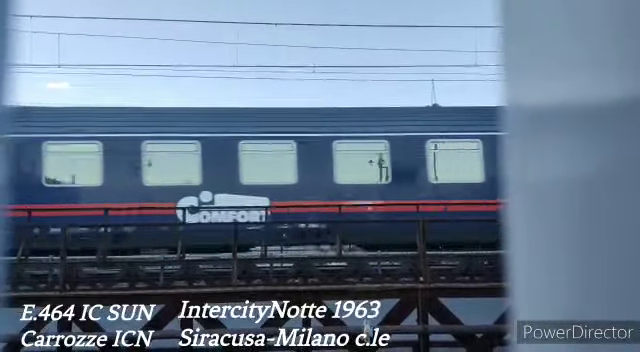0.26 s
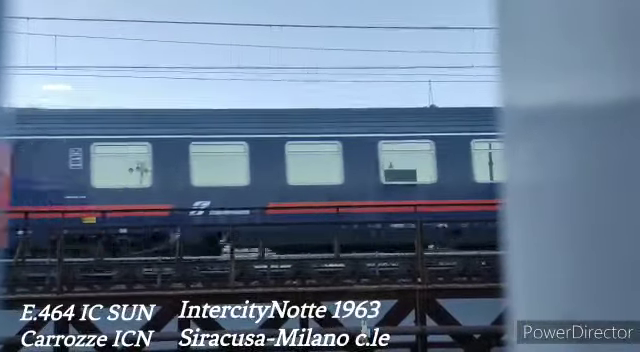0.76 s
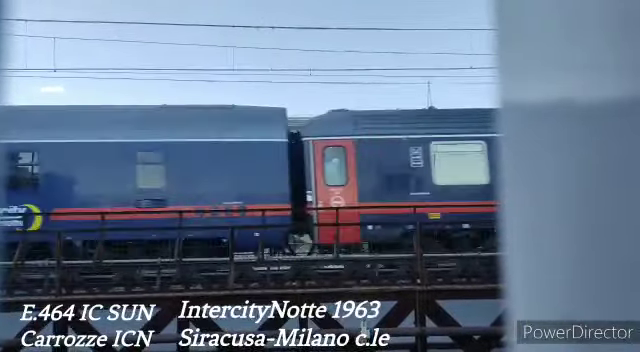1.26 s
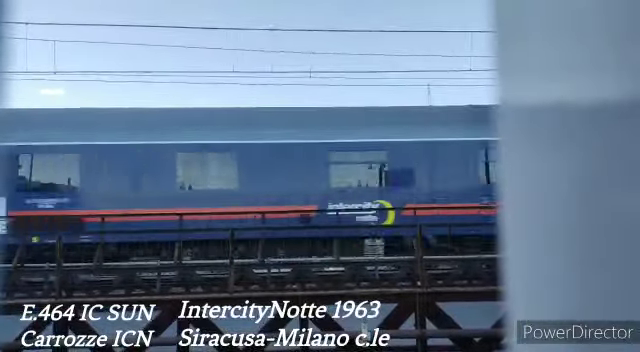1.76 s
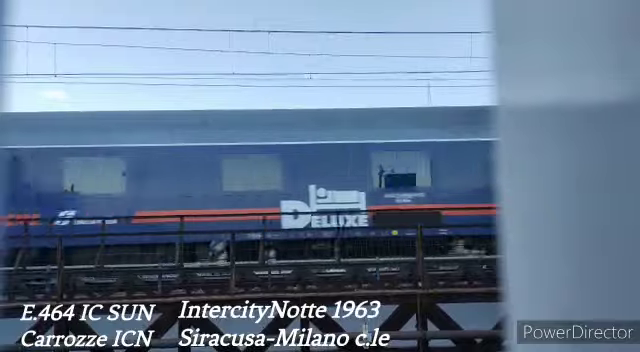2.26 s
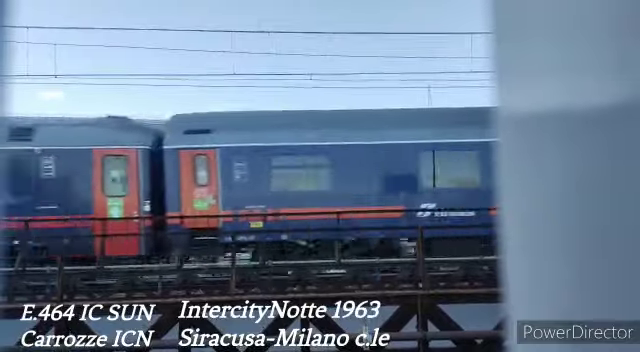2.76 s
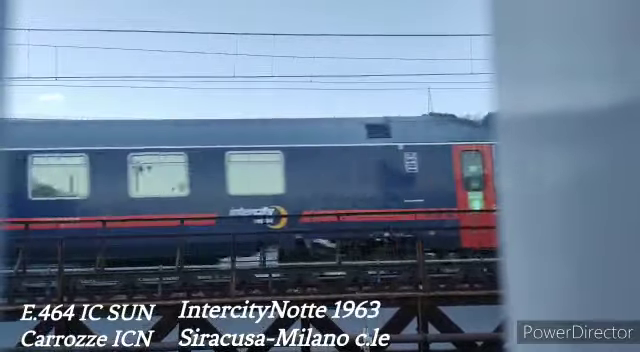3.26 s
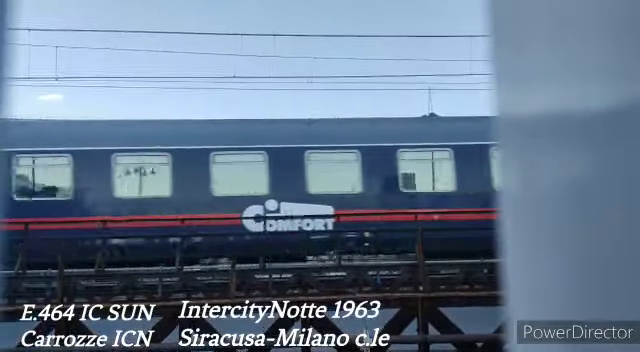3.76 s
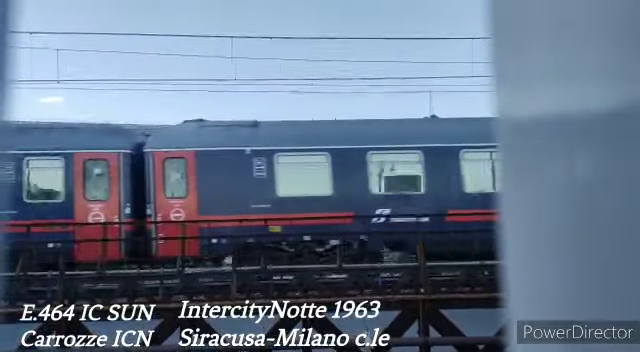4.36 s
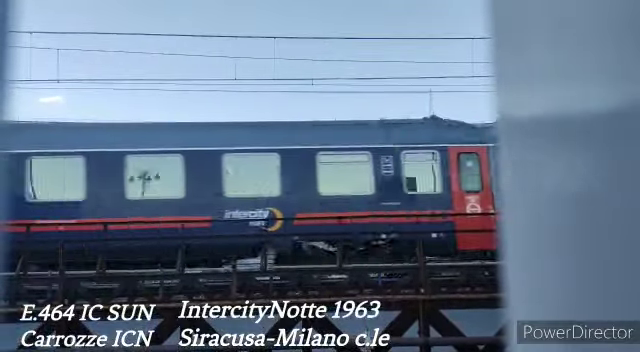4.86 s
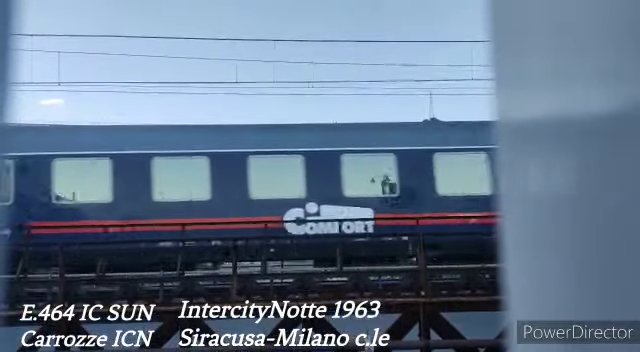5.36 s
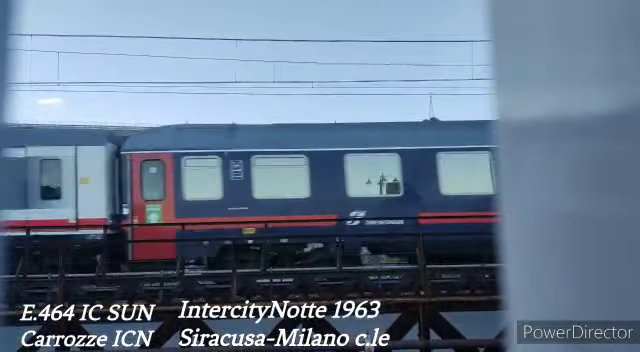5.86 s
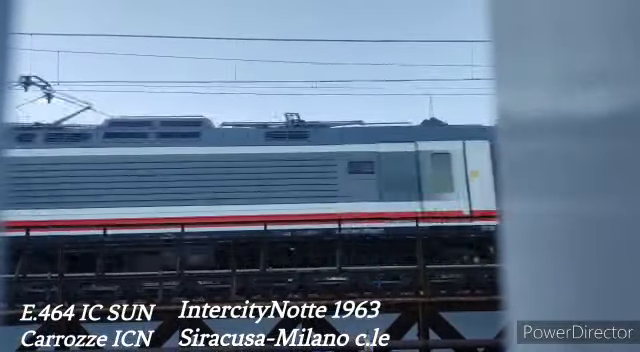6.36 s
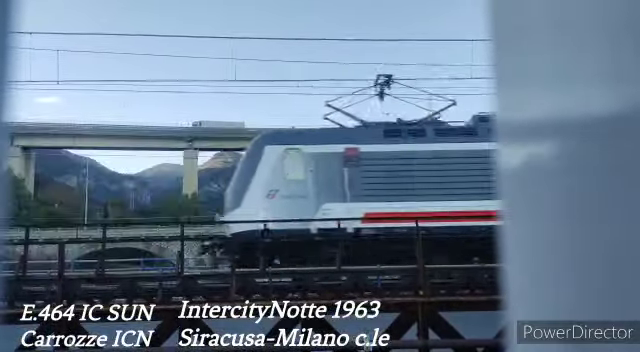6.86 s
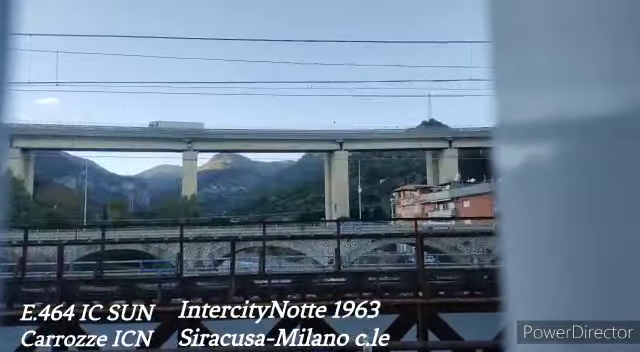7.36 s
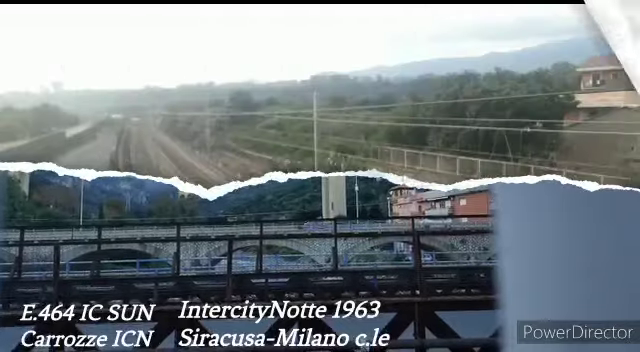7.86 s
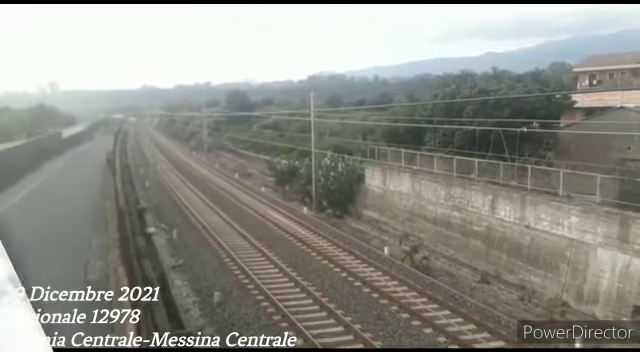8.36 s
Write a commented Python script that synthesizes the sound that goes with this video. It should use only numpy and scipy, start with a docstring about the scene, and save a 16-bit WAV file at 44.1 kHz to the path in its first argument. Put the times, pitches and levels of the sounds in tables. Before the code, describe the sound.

From 0 s a passenger train is already crossing a steel bridge very close by: girders boom with a low fluttering hum, wheels and deck roar, and rails rush and ring. The roar is strongest around 1.5-3 s, with scattered knocks, clanks of loose steel and deep thumps. Bright hissing scrapes and very short squeals crowd in near 3.5-5 s, shifting across the stereo. Around 4-7 s an out-of-round wheel thuds and throbs nearly six times a second. From about 6.2 s the rear electric locomotive brings a smeared, wavering whine and fan noise, peaking near 6.4-7.4 s and sinking slightly in pitch while the wheel noise recedes. At 7.4-7.65 s compressed air bursts out in sputtering puffs with a thin whistling tail. At 7.95 s everything cuts off. A tiny wash opens a quiet trackside murmur, with dry ticks near 8.2 and 8.45 s and a barely audible rustle.

```python
"""On a steel railway bridge, close by: a passenger train rolls over with its electric locomotive at the rear.
Filtered noise makes the girders boom, the deck roar, the rails ring and the bogies hiss; dying bursts of
force make knocks, clanks and thumps, and the roar and hiss throb with the turning of an out-of-round wheel.
The locomotive whines in smeared tones and blows off air as gated noise. The sound breaks off at 7.95 s;
a quiet trackside follows, with a dull murmur, a faint rustle and a few dry ticks."""
import sys
import numpy as np
from scipy import signal
from scipy.fft import rfft, irfft
from scipy.io import wavfile
from scipy.ndimage import uniform_filter1d, map_coordinates

SR = 44100
rng = np.random.default_rng(int(sys.argv[2]) if len(sys.argv) > 2 else 0)


def dump(signal):
    """Clip the signal to [-1, 1] and save it as 16-bit WAV at the path in sys.argv[1]."""
    limited = np.clip(np.atleast_2d(signal).T, -1, 1)
    pcm = np.round(limited * 32767).astype(np.int16)
    wavfile.write(sys.argv[1], SR, pcm)


N = 380583
TIME = np.arange(N) / SR
FREQS = np.maximum(np.fft.rfftfreq(N, 1 / SR), 1)

# In tables of things going by, the level is 3 dB down one half-width from the nearest or loudest moment.
# shaking of the bridge: (time [s], relative level [dB])
SHAKING = [(0, -19), (0.6, -20.5), (1.4, -16.5), (2.9, -15.5), (3.9, -17.5), (5.1, -18), (5.9, -16.5),
           (7.0, -20.5), (7.95, -28)]
# heavy bogies that make the span rumble: (nearest [s], half-width [s], relative level [dB])
HEAVY_BOGIES = [(.3, 0.56, -31.5), (3.6, 0.9, -26.5), (5.5, 0.8, -28), (6.8, 0.6, -29.5)]
# the roughest wheels add to the roar, on a bell curve: (nearest [s], half-width [s], extra level [dB])
ROUGH_WHEELS = [(1.1, 0.2, 0.4), (2.6, 1.6, 1.5), (7.0, 0.67, 1.4)]
# rumble of the girders: (frequency [Hz], relative density [dB per Hz])
GIRDER_SPECTRUM = [(20, -33), (33, -13.5), (48, -10.5), (60, -8.5), (78, -1), (115, -4), (150, -1),
                   (200, -11.5), (400, -36.5)]
# boom of the girders: (frequency [Hz], width [Hz], relative level [dB])
GIRDER_MODES = [(170, 37, -2), (215, 21, -2), (239.7, 21, -1)]
# roar of wheels and deck: (frequency [Hz], relative density [dB per Hz])
ROAR_SPECTRUM = [(170, -30), (270, -5.5), (320, 1), (380, -2.5), (480, -1.5), (620, -5.5), (780, -13.5),
                 (950, -10), (1150, -20), (2000, -47.5)]
# span modes that groan under bogies: (frequency [Hz], width [Hz], loudest [s], half-width [s], level [dB])
GROANS = [(164, 22, .25, 0.28, -30), (165, 22, 1.6, 0.28, -28), (163.6, 22, 4.75, .3, -26.5),
          (163, 22, 7.25, .3, -30.5), (415, 55, 1.1, 0.32, -29), (290, 30, 2.85, .22, -25.5),
          (560, 66, 3.7, 0.3, -30.5)]
# hum that rippled treads draw from the girders: (time [s], level [dB])
HUM_LEVEL = [(0, -24), (0.41, -40), (0.5, -23), (1.05, -21.5), (1.5, -24.5), (3.1, -25.5), (4.2, -28),
             (6.2, -28.5), (7.95, -43.5)]
# rush of the rails: (frequency [Hz], relative density [dB per Hz])
RAIL_SPECTRUM = [(800, 1.5), (1150, 1), (1350, 1), (1950, -2.5), (2700, -5.5), (3100, -6), (4000, -5),
                 (6000, -20)]
# ringing of rails and wheels: (frequency [Hz], width [Hz], loudest [s], half-width [s], level [dB])
RAIL_MODES = [(1570, 70, 3.4, 0.94, -34.5), (1674, 120, 2.1, 0.88, -39.5), (2250, 77, 2.5, 2.8, -38),
              (2734, 70, 2.6, 2.7, -42.5), (2200, 400, 6.74, 0.26, -36.5)]
# bogies that rub as they pass: (nearest [s], half-width [s], relative level [dB])
RUBBING_BOGIES = [(-.1, 0.35, -36), (2.599, 0.77, -35), (4.05, 0.54, -28), (4.65, 0.44, -29),
                  (6.3, 0.45, -33)]
# hiss of steel on steel: (frequency [Hz], relative density [dB per Hz])
HISS_SPECTRUM = [(2500, -14.5), (3600, -2.5), (4400, -8.5), (5100, 0.5), (6500, 4), (7250, 6.5),
                 (7950, 0.5), (9000, -1.5), (9600, -20.5), (10000, -13.5), (10800, -64.5), (12600, -21.5),
                 (15500, -50.5)]
# flange squeals and scrapes: (centre time [s], pitch [Hz], width [Hz], length [s], level [dB])
SQUEALS = [(0.065, 1960, 200, 0.056, -31.5), (0.127, 7200, 800, 0.038, -36), (0.122, 6040, 500, 0.029, -31),
           (0.331, 2280, 200, 0.014, -27), (0.39, 2270, 180, 0.017, -32.5), (0.69, 1920, 800, .006, -36),
           (0.89, 2050, 100, 0.021, -33), (1.595, 2290, 80, 0.014, -37), (2.535, 2290, 80, .016, -36),
           (2.587, 7100, 400, 0.017, -30), (2.728, 1900, 900, 0.0045, -35), (2.83, 2080, 900, 0.016, -32),
           (3.06, 7250, 1400, 0.042, -27.5), (3.586, 5540, 2210, 0.041, -28.5),
           (3.83, 2450, 120, 0.013, -33), (3.968, 7440, 1200, 0.021, -19.5), (4.06, 7340, 800, 0.028, -26),
           (4.148, 7600, 850, 0.022, -25), (4.407, 7200, 1200, 0.013, -21),
           (4.677, 4560, 1200, 0.087, -28.5), (4.694, 7700, 850, 0.061, -26.5),
           (4.82, 7300, 800, 0.0089, -20), (4.827, 2100, 700, 0.014, -27.5), (5.356, 1800, 800, .005, -25),
           (5.77, 2270, 90, .016, -36), (5.806, 7800, 900, 0.018, -27), (5.887, 2000, 700, 0.026, -31),
           (6.199, 1590, 700, .007, -23.5), (6.216, 6440, 1500, 0.018, -33), (7.218, 1700, 800, .005, -27),
           (6.55, 6900, 1400, 0.017, -28)]
# further, louder knocks, most in step with the out-of-round wheel's turn: (time [s], relative level [dB])
LOUD_KNOCKS = [(1.24, -16.5), (1.957, -15.5), (2.105, -14.5), (2.745, -14.5), (2.908, -13),
               (3.282, -12.5), (3.618, -14.5), (3.807, -16), (4.11, -14), (4.443, -12.5), (4.611, -16),
               (4.932, -15), (5.322, -18), (5.825, -19.5), (5.865, -15.5), (6.522, -20)]
# body of a knock: (frequency [Hz], relative density [dB per Hz])
KNOCK_SPECTRUM = [(40, -13.5), (85, -2), (170, -7), (230, 16.5), (300, -8), (480, -2), (800, -16.5),
                  (2200, -20), (5000, -26), (12000, -72)]
# clanks of loose deck steel: (time [s], relative level [dB])
CLANKS = [(0.376, -23.5), (0.873, -22), (1.117, -21), (2.159, -17.5), (2.262, -22), (2.336, -15.5),
          (2.448, -19.5), (2.915, -19.5), (3.459, -15), (3.534, -17), (4.095, -16), (4.479, -21.5),
          (5.18, -16.5), (5.956, -22), (6.355, -17.5), (6.855, -19)]
# body of a clank: (frequency [Hz], relative density [dB per Hz])
CLANK_SPECTRUM = [(270, -3), (350, 2.5), (500, -2.5), (700, -6), (1100, -17.5), (2400, -25.5), (5000, -36)]
# thumps of the span under a heavy axle: (time [s], relative level [dB])
THUMPS = [(2.51, -24), (3.55, -24), (3.785, -19), (4.395, -21), (5.485, -18.5)]
# body of a thump: (frequency [Hz], relative density [dB per Hz])
THUMP_SPECTRUM = [(40, -10), (60, -1), (85, 2), (120, -7)]
# drive tones: (multiple of mesh pitch [ratio], width [Hz], loudest [s], half-width [s], relative level [dB])
DRIVE_TONES = [(.47, 18, 7.0, 1.0, -0.5), (.725, 14, 6.6, .4, -11), (1, 20, 7.04, .75, 1.1),
               (1.435, 38, 7.84, .8, -3.5), (1.96, 110, 6.7, 0.78, -8), (3.02, 91, 8.7, .9, -7.5)]
# cooling fans: (frequency [Hz], relative density [dB per Hz])
FAN_SPECTRUM = [(700, 3.0), (1050, 2.0), (1500, -1.0), (2400, -10.5)]
# puffs of compressed air: (fully open [s], hold [s], relative level [dB])
AIR_PUFFS = [(7.392, 0.02, -22.5), (7.412, 0.079, -20), (7.526, 0.061, -20), (7.617, 0.015, -20)]
# air jet: (frequency [Hz], relative density [dB per Hz])
JET_SPECTRUM = [(1760, -38), (3000, -7.5), (3500, -14.5), (4720, -5.5), (5130, -1.5), (5800, -5.5),
                (7080, -1.5), (8120, -8.5), (9650, -15), (11500, -31), (12300, -16), (15500, -33.5)]
# whistles of the jet's pipe: (frequency [Hz], width [Hz], relative level [dB])
JET_MODES = [(3750, 80, -6.5), (5020, 100, -0.5), (5990, 44, -7), (7130, 45, -6), (7430, 40, 4),
             (8400, 50, -1), (9100, 40, -4), (9400, 35, -3)]
# quiet trackside murmur: (frequency [Hz], relative density [dB per Hz])
MURMUR_SPECTRUM = [(15, -63), (25, -27), (96, -6.5), (188, 0.5), (322, -6), (648, -8.5), (945, -15),
                   (1170, -11), (1490, -18), (3170, -29.5), (7300, -53), (9050, -50), (11500, -45),
                   (15500, -39)]
# brief wash that opens the trackside: (frequency [Hz], relative density [dB per Hz])
WASH_SPECTRUM = [(120, -2), (400, -5), (900, 21), (2500, 9), (5000, -12), (6500, -26), (9000, -39)]
# faint rustle: (frequency [Hz], relative density [dB per Hz])
RUSTLE_SPECTRUM = [(1500, -0.5), (5500, -3), (7000, -18)]
# small dry ticks: (time [s], centre [Hz], relative peak level [dB])
TICKS = [(8.207, 2400, -46), (8.436, 1000, -32), (8.456, 1400, -29)]
# how alike the two channels are: (frequency [Hz], likeness [0-1])
LIKENESS = [(60, 0.97), (140, 0.96), (280, 0.91), (550, 0.78), (1100, 0.65), (2200, 0.47), (5000, 0.47)]
# tilt between the channels: (frequency [Hz], left minus right [dB])
BALANCE = [(40, 1), (170, 4), (350, 2), (700, 0.4), (2800, 0.5), (5600, -4.6), (9000, -2.5), (14000, 1)]

BREAK_S, RESUME_S = 7.95, 7.99  # the train breaks off, the quiet track begins
TOP_HZ = 15500
TAIL_S, RECEDE_DB_PER_S = 6.83, 4  # the last wheels leave and their sound falls away
# the left channel hears a bogie this much later, more as it comes and less as it goes
LAG_MS, LAG_SWING_MS = 0.2945, 0.253
TURN_HZ, TURN_S = 5.91, 5.485  # the out-of-round wheel: turns a second, and a moment when it presses hardest
THROB_PEAK_S, THROB_HALF_S, THROB_DEPTH = 5.4, 1.6, 1.7
BOOM_THROB, ROAR_THROB, SCRAPE_THROB = 1.3, 0.8, 1.05  # swing [dB] for each unit of throb depth
SCRAPE_LAG_S = 0.027  # the hiss swells this long after each thud
BOOM_SHARE_DB, ROAR_SHARE_DB = -4.7, -6  # offsets from the shaking
HUM_HZ, HUM_WANDER_HZ, HUM_FLUTTER_DB = 228.7, 3.99, 1.8
RING_NEAR_S, RING_HALF_S, RING_DB = 3.83, 2.19, -28  # swell of the rails; each layer is trimmed from here
THUD_NEAR_S, THUD_HALF_S, THUD_DB, THUD_SCATTER_DB = 6.1, 1, -16.5, -2
MESH_HZ, SAG_HZ_PER_S, MESH_WAVER_HZ = 693.3, 15, 2  # gear mesh pitch as it arrives, and how it sinks
DRIVE_S, DRIVE_DB, DRIVE_HOLD_S = 6.38, -30, 1
DRIVE_RISE_DB_PER_S, DRIVE_FALL_DB_PER_S = 25.5, 8.5
AIR_RISE_DB_PER_S, AIR_FALL_DB_PER_S = 3204, 96
WHISTLE_DB, WHISTLE_FALL_DB_PER_S = -6.5, 63
MURMUR_DB = -48
RUSTLE_S, RUSTLE_HALF_S, RUSTLE_DB = 8.465, .06, -68
FLARE_S, FLARE_HZ = 0.03, 240  # length and width of a flare in the treble
RAIL_FLARE_DB, HISS_FLARE_DB, JET_FLARE_DB = 2.3, 2.4, 1.8


def undb(db):
    """Decibels to gain."""
    return 10 ** (np.asarray(db) / 20)


def unit(x):
    """Scale to rms 1."""
    return x / np.sqrt(np.mean(x ** 2))


def curve(rows):
    """Join a table of (time, level) by straight lines."""
    s, db = np.transpose(rows)
    return np.interp(TIME, s, db)


def across(points):
    """Join a table over frequency on a log axis."""
    hz, value = np.transpose(points)
    return np.interp(np.log(FREQS), np.log(hz), value)


def colour(points):
    """Gain over frequency, falling steeply beyond both ends."""
    low_skirt = np.minimum(FREQS / points[0][0], 1)
    high_skirt = np.minimum(points[-1][0] / FREQS, 1)
    return undb(across(points)) * (low_skirt * high_skirt) ** 4


def resonances(modes):
    """Response of damped modes, each applied twice so that the valleys stay dark."""
    power = 0
    for hz, width, db in modes:
        detune = (FREQS / hz - hz / FREQS) * hz / width / 2
        power = power + undb(db) ** 2 / width / (1 + detune ** 2) ** 2
    return np.sqrt(power)


def walk(rate):
    """Random levels held 1 / rate s and slewed twice; spread 1."""
    k = int(SR / rate)
    held = np.repeat(rng.standard_normal(N // k + 2), k)
    held = held[rng.integers(k):][:N]
    return unit(uniform_filter1d(uniform_filter1d(held, k), k))


def bell(centre_s, half_width_s, height):
    """A smooth rise and fall, down to 1 / e at the half-width."""
    return height * np.exp(-((TIME - centre_s) / half_width_s) ** 2)


def envelope(full_s, hold_s, rise_db_per_s, fall_db_per_s):
    """Attack, hold and release, in dB below the top."""
    attack = rise_db_per_s * np.maximum(full_s - TIME, 0)
    release = fall_db_per_s * np.maximum(TIME - full_s - hold_s, 0)
    return -attack - release


def passing(nearest_s, half_width_s, db, t=TIME):
    """Level in dB of a source going by on a straight line, weaker by 1 / distance."""
    return db - 10 * np.log10(1 + ((t - nearest_s) / half_width_s) ** 2)


def receding(t=TIME):
    """Loss in dB once the end of the train has gone by."""
    return -RECEDE_DB_PER_S * np.maximum(t - TAIL_S, 0)


def bogies(rows):
    """Joint level in dB of several bogies going by, their powers added."""
    return 10 * np.log10(sum(undb(passing(*row)) ** 2 for row in rows)) + receding()


def throb(lag_s=0):
    """The out-of-round wheel presses hardest once a turn, most plainly while it is near."""
    turning = np.cos(2 * np.pi * TURN_HZ * (TIME - TURN_S - lag_s))
    return turning * bell(THROB_PEAK_S, THROB_HALF_S, THROB_DEPTH)


def radiate(response, force=1, lag_ms=.3):
    """Random force through a response, heard in two partly alike channels, the left one later."""
    a, b = rfft(rng.standard_normal((2, N)) * force)
    like = np.clip(across(LIKENESS), 0, .999)
    sides = np.array([[1], [-1]])
    channels = np.sqrt(1 + like) * a + sides * np.sqrt(1 - like) * b
    channels = channels * undb(sides * across(BALANCE) / 2)
    delay = np.exp(-1j * np.pi * FREQS * sides * lag_ms / 1000)  # half the lag each way
    return unit(irfft(channels * delay * response, N))


def modes_going_by(rows, force, lag_ms):
    """Each mode rings under the force and swells as its source goes by."""
    out = 0
    for hz, width, *swell in rows:
        mode = radiate(resonances([(hz, width, 0)]), force, lag_ms)
        out = out + mode * undb(passing(*swell))
    return out


def blows(rows, points, rise_s, decay_s):
    """Each blow shakes a structure with a short dying burst of force."""
    force = np.zeros(N)
    for s, db in rows:
        start = int(s * SR)
        age = TIME[:min(N - start, SR // 2)]
        burst = (1 - np.exp(-age / rise_s)) * np.exp(-age / decay_s)
        force[start:start + len(age)] += undb(db) * burst
    return radiate(colour(points), force, lag_ms=0.22) * np.sqrt(np.mean(force ** 2))


def flare(channels, depth_db):
    """Narrow bands swell and sink at random, each on its own."""
    hz, s, cells = signal.stft(channels, SR, nperseg=512)
    db = rng.standard_normal(cells.shape[1:])
    db = uniform_filter1d(db, int(FLARE_S / s[1]), axis=1)
    db = unit(uniform_filter1d(db, round(FLARE_HZ / hz[1]), axis=0))
    flared = signal.istft(cells * undb(depth_db * db), SR, nperseg=512)[1]
    return unit(flared[:, :N])


def bridge(rumble_db, boom_db, roar_db, turn):
    """Wheel roughness shakes the span: it rumbles, girders boom and groan in modes, wheels and deck roar."""
    load = undb(BOOM_THROB * turn + .25 * walk(25))
    roar_force = undb(ROAR_THROB * turn + walk(19) + walk(90))
    rumble = radiate(colour(GIRDER_SPECTRUM), load, lag_ms=0.25) * undb(rumble_db + 3.0)
    boom = radiate(resonances(GIRDER_MODES), load, lag_ms=0.36) * undb(boom_db + 1.5)
    roar = radiate(colour(ROAR_SPECTRUM), roar_force, lag_ms=0.28) * undb(roar_db - 0.5)
    groan = modes_going_by(GROANS, load, lag_ms=.3)
    return rumble + boom + groan + roar


def hum():
    """Rippled wheel treads hold the main girder mode in a slightly wandering, fluttering note."""
    phase = 2 * np.pi * np.cumsum(HUM_HZ + HUM_WANDER_HZ * walk(7)) / SR
    balance = undb(np.array([[1.6], [-1.6]]))
    channels = balance * np.sin(phase - np.array([[.5], [0]]))
    return unit(channels) * undb(curve(HUM_LEVEL) + HUM_FLUTTER_DB * walk(14))


def rails(ring_db, turn):
    """Rattling contact excites a broad rush; ringing bands swell and fade as different wheels go by."""
    contact = undb(0.44 * turn + 0.6 * walk(30) + 0.85 * walk(300))
    rush = flare(radiate(colour(RAIL_SPECTRUM), contact, lag_ms=0.41), RAIL_FLARE_DB)
    ring = modes_going_by(RAIL_MODES, contact, lag_ms=0.45)
    discs = undb(-12.5) * wheel_rings()
    return (undb(1.85) * rush + discs) * undb(ring_db) + ring * undb(receding())


def wheel_rings(count=800):
    """Wheel discs ring up and die away at random, each note bent down as its wheel goes by."""
    out = np.zeros((2, N))
    age = TIME[:SR // 4] - TIME[SR // 8]
    for when, pitch, size, lag in rng.random((count, 4)):
        start = int(when * (N - len(age)))
        hz = 1400 * 2 ** pitch
        phase = 2 * np.pi * (hz * age * (1 - 0.039 * age) + np.array([[0], [lag]]))
        out[:, start:start + len(age)] += size * np.exp(-(age / 0.013) ** 2) * np.sin(phase)
    return unit(out)


def rubbing():
    """Each rubbing bogie scrapes in grains and short surges as it crosses, swelling with each wheel turn."""
    grains = undb(.3 * walk(14) + .45 * walk(70) + 1.2 * walk(500))
    hiss = colour(HISS_SPECTRUM)
    out = 0
    for s, half_s, db in RUBBING_BOGIES:
        scrape = cross(radiate(hiss, grains, lag_ms=0), s, 2 * half_s)
        out = out + scrape * undb(passing(s, half_s, db))
    out = flare(out, HISS_FLARE_DB) * np.sqrt(np.mean(out ** 2))
    return out * undb(receding() + SCRAPE_THROB * throb(SCRAPE_LAG_S) + 3.5)


def cross(channels, nearest_s, half_width_s):
    """A source going by leads at the right channel less and less, so the sound swings across."""
    lag = (LAG_MS - LAG_SWING_MS * np.tanh((TIME - nearest_s) / half_width_s)) / 1000
    left = map_coordinates(channels[0], [(TIME - lag) * SR], order=3, mode="mirror")
    return np.array([left, channels[1]])


def squeals():
    """A flange catches the rail: a wheel mode sings for a moment, or the steel grates over a wide band."""
    contact = radiate(1, lag_ms=0.427)
    out = np.zeros((2, N))
    for s, hz, width_hz, length_s, db in SQUEALS:
        near = np.abs(TIME - s) < 4 * length_s
        count = near.sum()
        mode = np.exp(-((np.fft.rfftfreq(count, 1 / SR) - hz) / width_hz) ** 2)
        swell = np.exp(-((TIME[near] - s) / length_s) ** 2)
        out[:, near] += undb(db) * swell * unit(irfft(rfft(contact[:, near]) * mode, count))
    return out


def knocks():
    """The out-of-round wheel thuds once a turn as it goes by; a table adds louder knocks, most of them in step
    with the turn."""
    s = np.arange(TURN_S % (1 / TURN_HZ), BREAK_S, 1 / TURN_HZ)
    db = passing(THUD_NEAR_S, THUD_HALF_S, THUD_DB, t=s) + receding(s)
    db = db + THUD_SCATTER_DB * rng.standard_normal(len(s))
    db = db - 3 * ((s - THUD_NEAR_S) / THUD_HALF_S) ** 2  # the girders screen it when far off
    rows = list(zip(s, db)) + LOUD_KNOCKS
    return undb(2.5) * blows(rows, KNOCK_SPECTRUM, rise_s=0.0036, decay_s=0.027)


def deck():
    """Loose steel clanks and the span thumps as axles cross it, each a short burst of force."""
    clanks = blows(CLANKS, CLANK_SPECTRUM, rise_s=0.0011, decay_s=0.016)
    thumps = blows(THUMPS, THUMP_SPECTRUM, rise_s=0.011, decay_s=0.029)
    return clanks * undb(2.0) + thumps * undb(6.5)


def locomotive():
    """Gears and motors sing wavering tones over the cooling fans, sinking slightly as they move away."""
    sag_hz = SAG_HZ_PER_S * np.maximum(TIME - DRIVE_S, 0)
    mesh_hz = MESH_HZ - sag_hz + MESH_WAVER_HZ * walk(9)
    whine = 0
    for multiple, width_hz, *swell in DRIVE_TONES:
        whine = whine + undb(passing(*swell)) * tone(multiple * mesh_hz, width_hz)
    fans = undb(-4) * radiate(colour(FAN_SPECTRUM), lag_ms=0.072)
    db = DRIVE_DB + envelope(DRIVE_S, DRIVE_HOLD_S, DRIVE_RISE_DB_PER_S, DRIVE_FALL_DB_PER_S)
    return (whine + fans) * undb(db)


def tone(hz, width_hz):
    """A tone smeared by reflections from the girders, a little differently in each channel."""
    shared, left, right = (walk(2 * width_hz) + 1j * walk(2 * width_hz) for _ in range(3))
    phase = 2 * np.pi * np.cumsum(hz) / SR
    smear = shared + 0.73 * np.array([left, right])
    return unit(np.real(smear * np.exp(1j * phase)))


def air_release():
    """A valve snaps open in puffs and the sputtering jet dies away; its pipe whistles on a little longer."""
    sputter = undb(0.8 * walk(90) + 1.3 * walk(700))
    comb = echoes(.28, .006)
    jet = flare(radiate(colour(JET_SPECTRUM) * comb, sputter, lag_ms=0.13), JET_FLARE_DB)
    whistle = radiate(resonances(JET_MODES), lag_ms=0.08)
    jet = undb(-0.5) * jet * puffs(AIR_FALL_DB_PER_S)
    return jet + undb(WHISTLE_DB) * whistle * puffs(WHISTLE_FALL_DB_PER_S)


def puffs(fall_db_per_s):
    """Gain of the air as pressure opens and runs down; the strongest puff rules."""
    levels = [db + envelope(s, hold_s, AIR_RISE_DB_PER_S, fall_db_per_s) for s, hold_s, db in AIR_PUFFS]
    return undb(np.max(levels, axis=0))


def echoes(strength, longest_s, count=6):
    """A few quick reflections from the steelwork comb a sound into uneven bands."""
    comb = 1
    for late in rng.random(count):
        delay_s = longest_s * (1 + late) / 2
        comb = comb + strength * np.exp(-2j * np.pi * FREQS * delay_s)
    return np.abs(comb)


def trackside():
    """A dull far-off murmur opens with a brief wash of noise; dry ticks sit amid a faint rustle."""
    murmur = radiate(colour(MURMUR_SPECTRUM), undb(1.1 * walk(26)), lag_ms=0) * undb(MURMUR_DB)
    wash = blows([(RESUME_S, -41)], WASH_SPECTRUM, rise_s=0.00027, decay_s=0.029)
    rustle = radiate(colour(RUSTLE_SPECTRUM), undb(2.5 * walk(120)), lag_ms=0)
    rustle = rustle * bell(RUSTLE_S, RUSTLE_HALF_S, undb(RUSTLE_DB))
    balance = undb(np.array([[-1.2], [1.2]]))
    return (murmur + wash + rustle + ticks()) * balance


def ticks():
    """Each tick is one dry snap, a few octaves wide."""
    out = 0
    for s, hz, db in TICKS:
        snap = irfft(np.exp(-(np.log2(FREQS / hz) / 1.2) ** 2), N)
        out = out + undb(db) * np.roll(snap / snap.max(), int(s * SR))
    return out


def scene():
    """The train until the sound breaks off, then the quiet track."""
    turn = throb()
    shake_db = curve(SHAKING)
    roar_db = shake_db + ROAR_SHARE_DB + sum(bell(*row) for row in ROUGH_WHEELS)
    ring_db = passing(RING_NEAR_S, RING_HALF_S, RING_DB) + receding()
    span = bridge(bogies(HEAVY_BOGIES), shake_db + BOOM_SHARE_DB, roar_db, turn) + hum()
    wheels = rails(ring_db, turn) + rubbing() + squeals() + knocks() + deck()
    train = span + wheels + locomotive() + air_release()
    before = uniform_filter1d(1. * (TIME < BREAK_S), size=128)
    after = uniform_filter1d(1. * (TIME > RESUME_S), size=128)
    return train * before + trackside() * after


def record(dry):
    """A steep low-pass filter cuts the top."""
    return signal.sosfilt(signal.ellip(8, .2, 70, TOP_HZ, fs=SR, output="sos"), dry)


dry = scene()
out = record(dry)
dump(out)
```